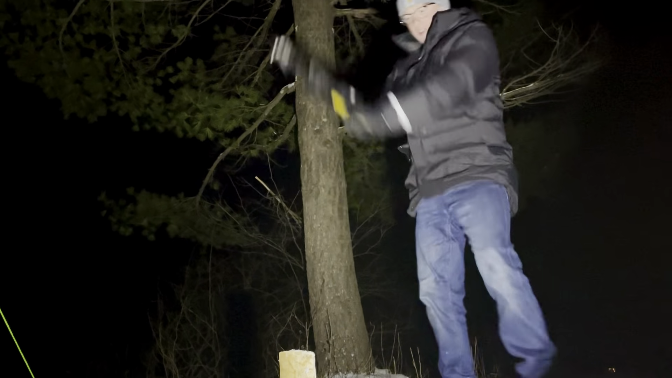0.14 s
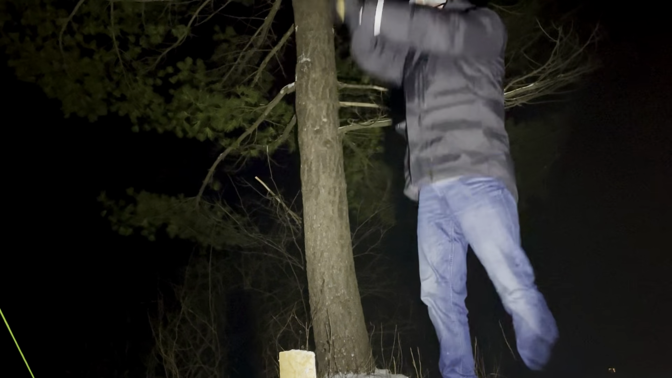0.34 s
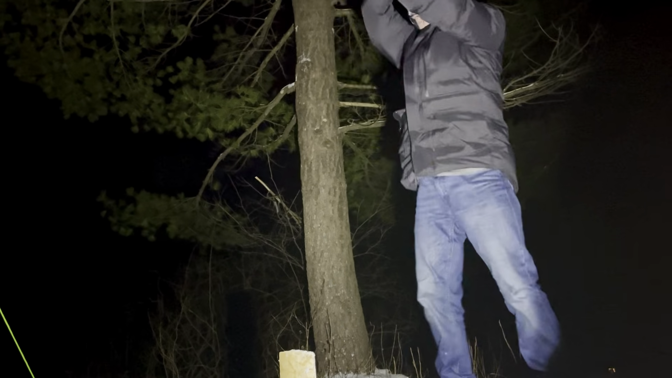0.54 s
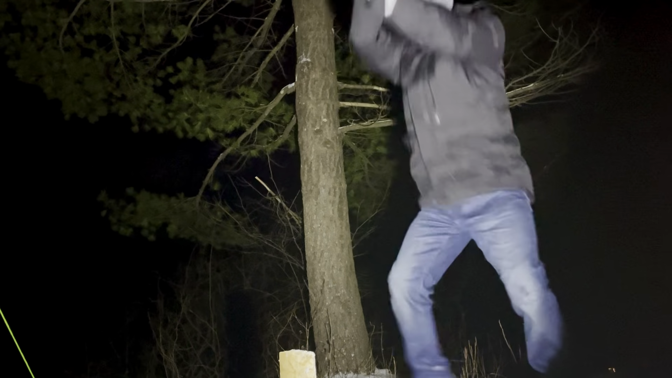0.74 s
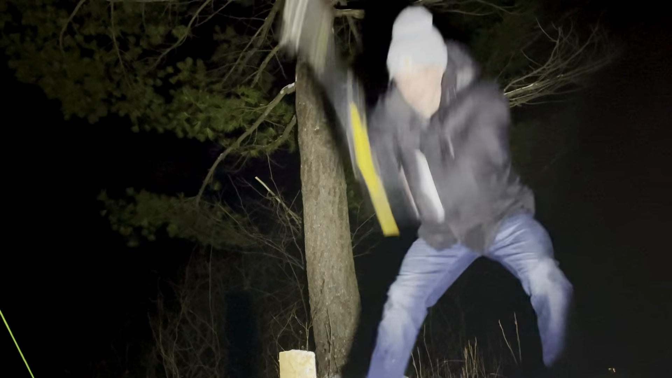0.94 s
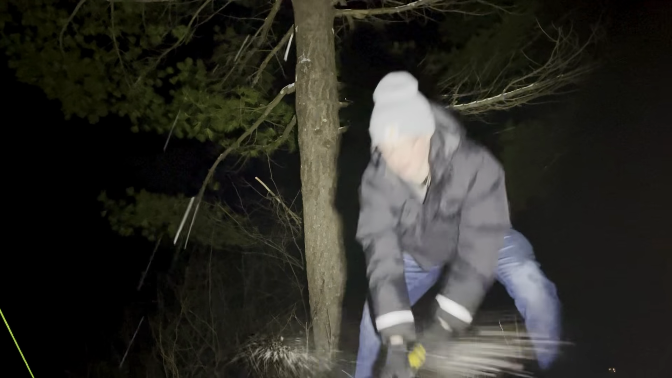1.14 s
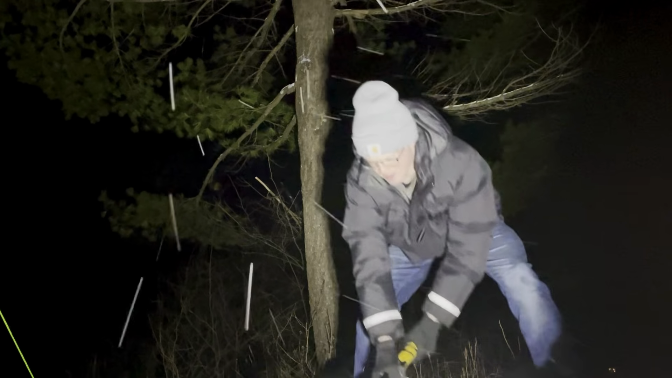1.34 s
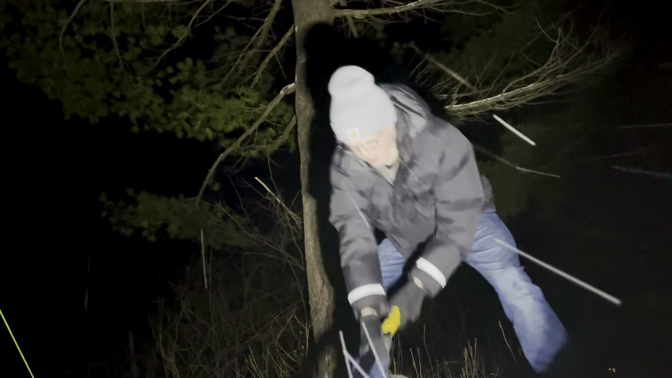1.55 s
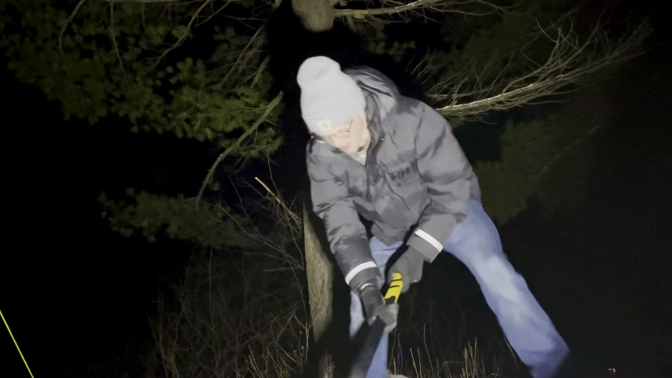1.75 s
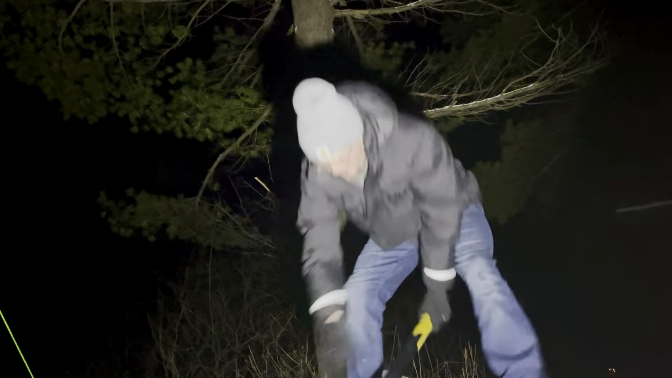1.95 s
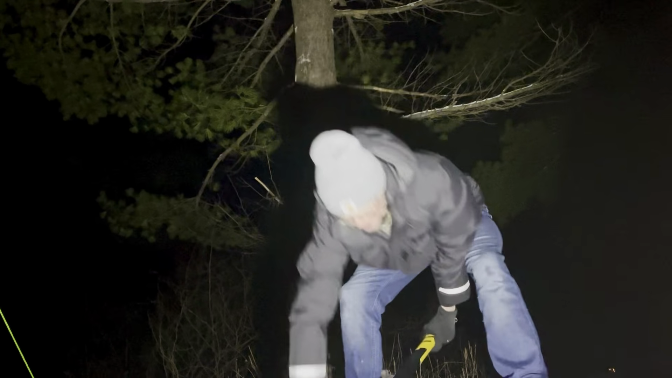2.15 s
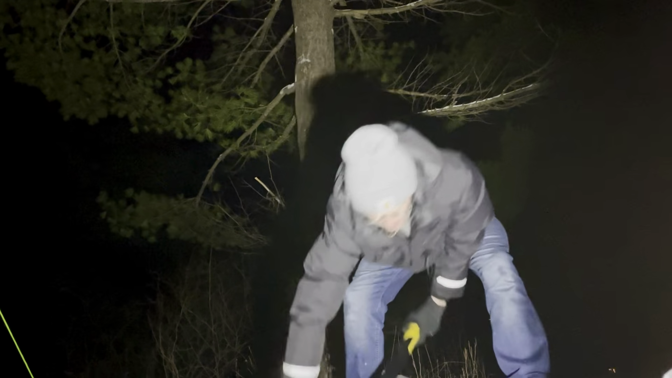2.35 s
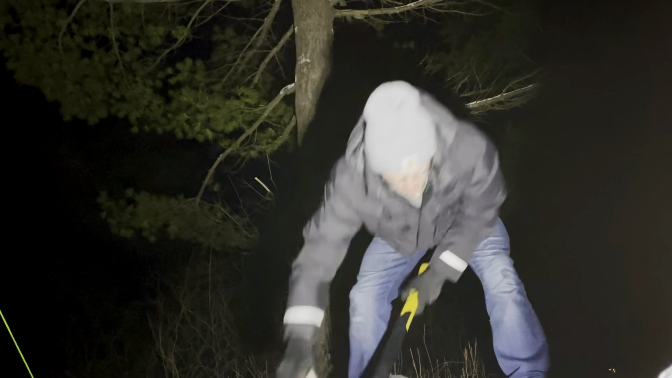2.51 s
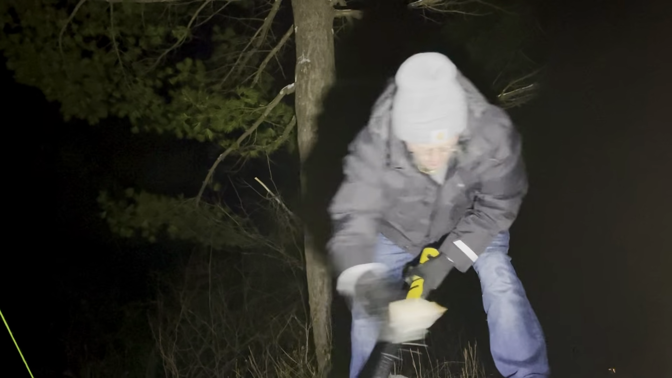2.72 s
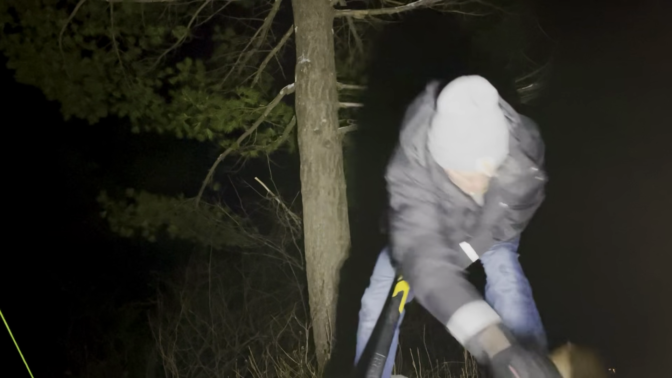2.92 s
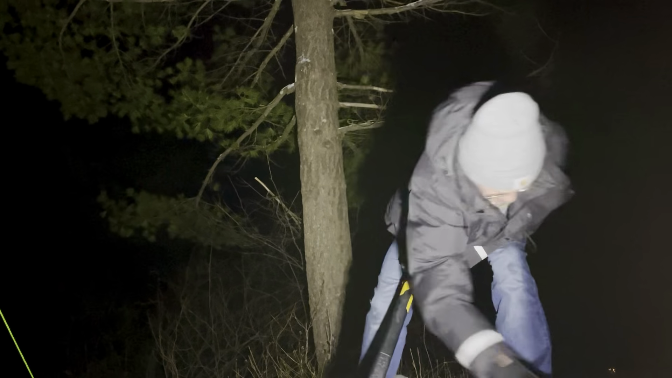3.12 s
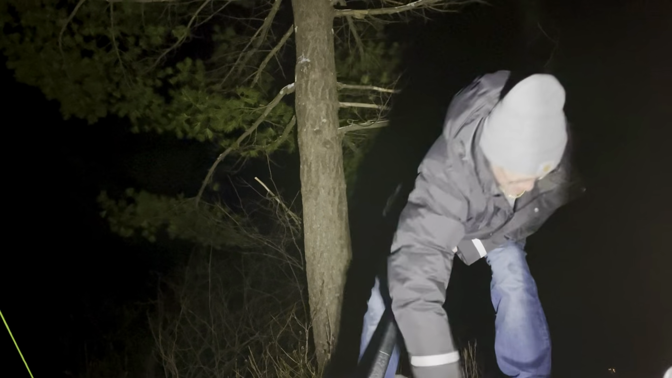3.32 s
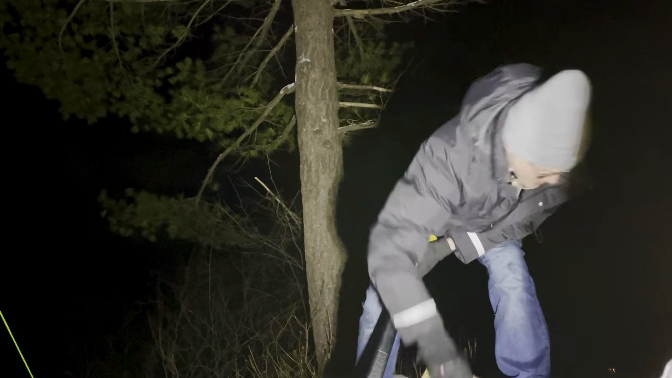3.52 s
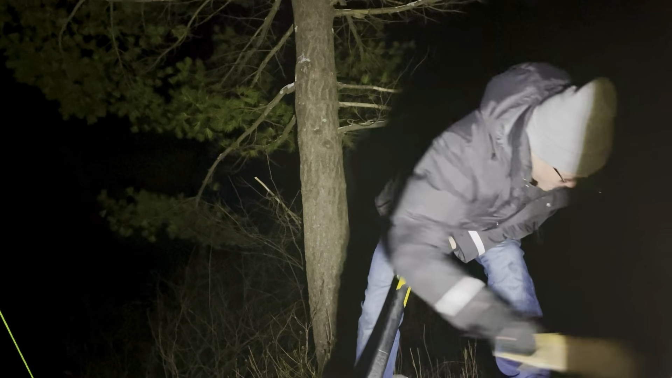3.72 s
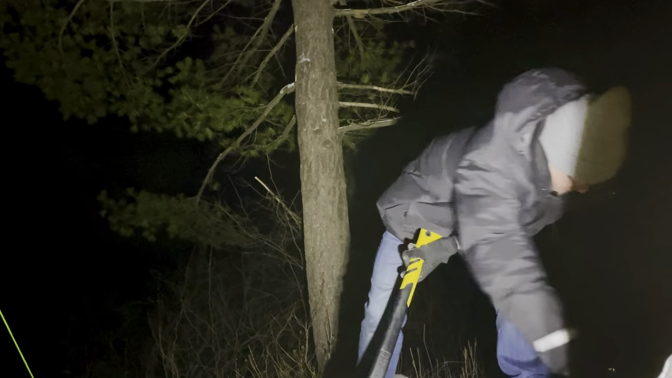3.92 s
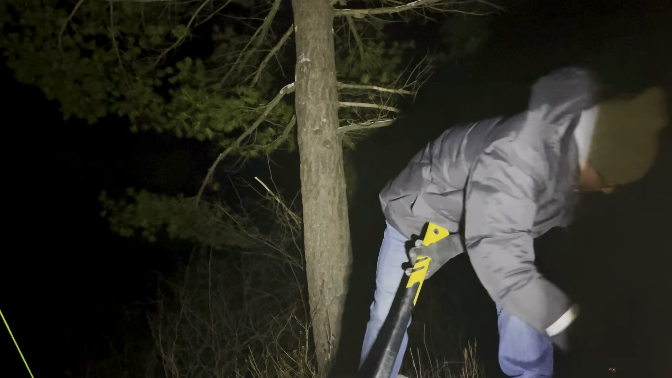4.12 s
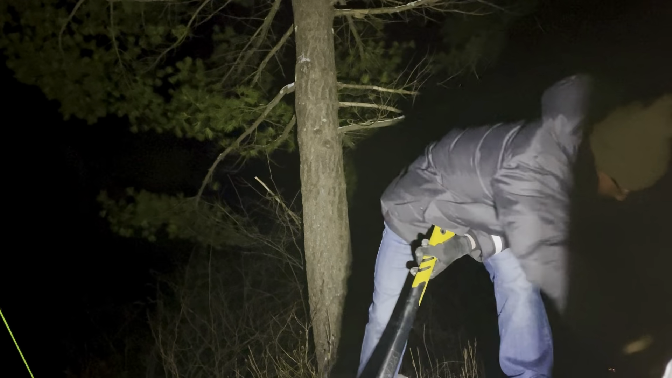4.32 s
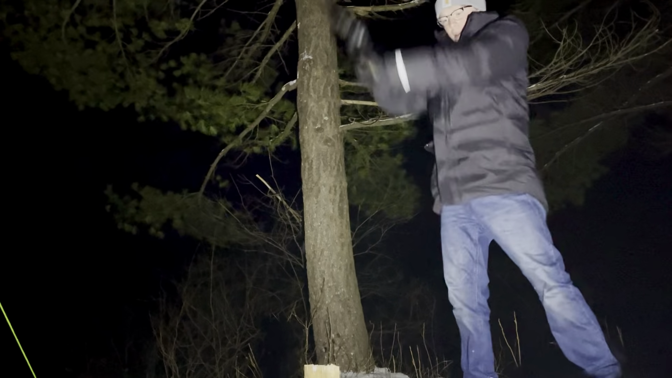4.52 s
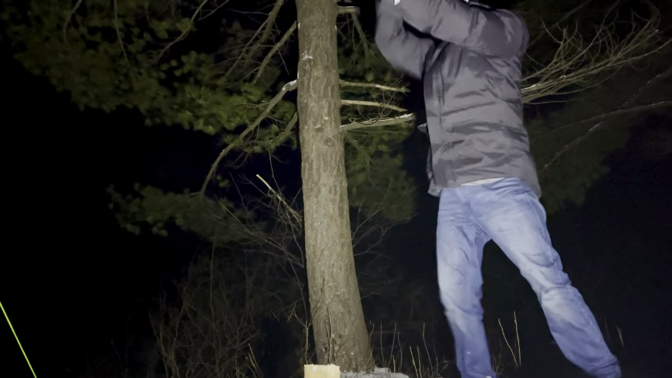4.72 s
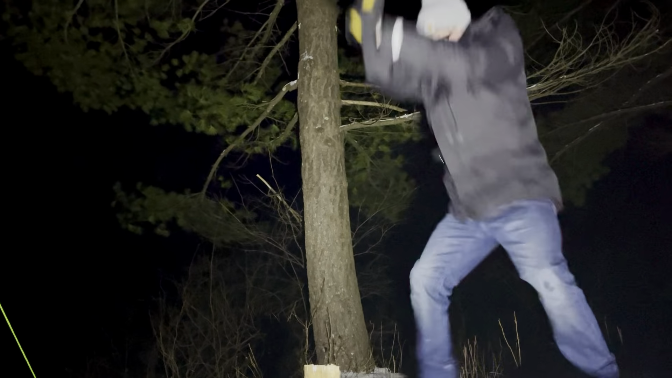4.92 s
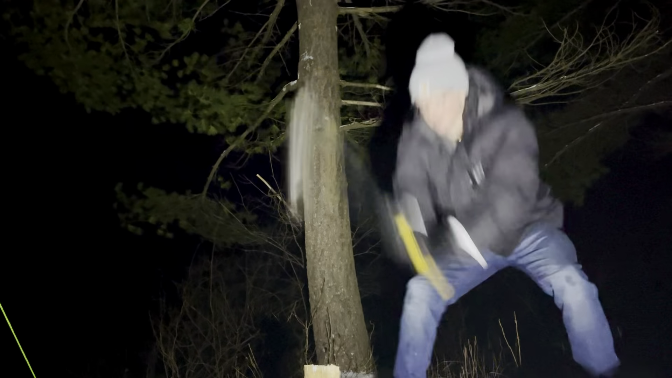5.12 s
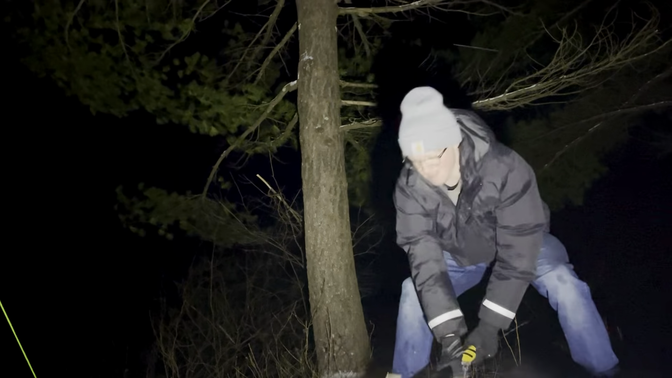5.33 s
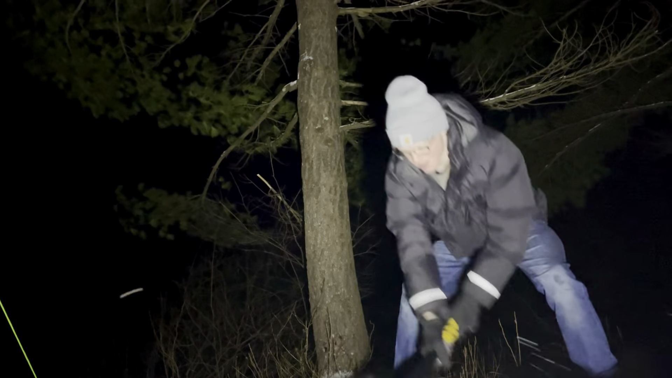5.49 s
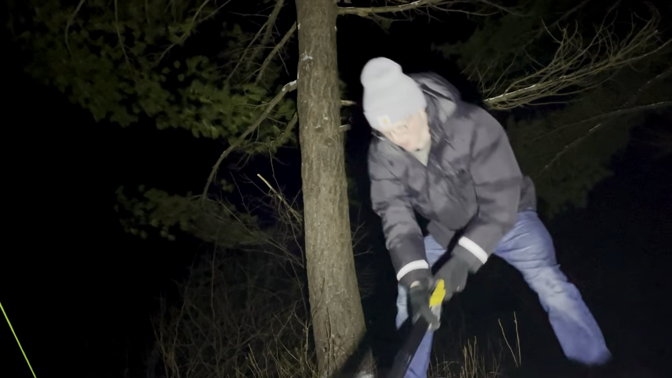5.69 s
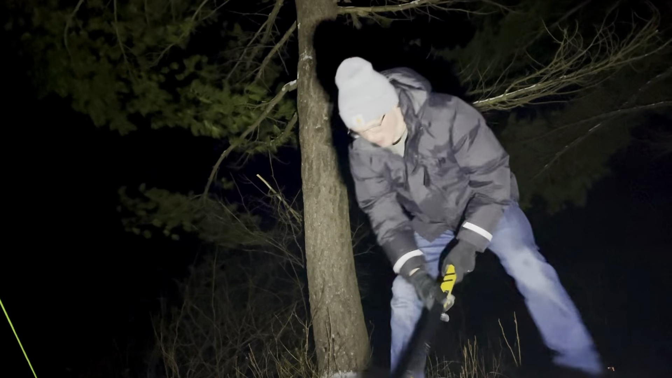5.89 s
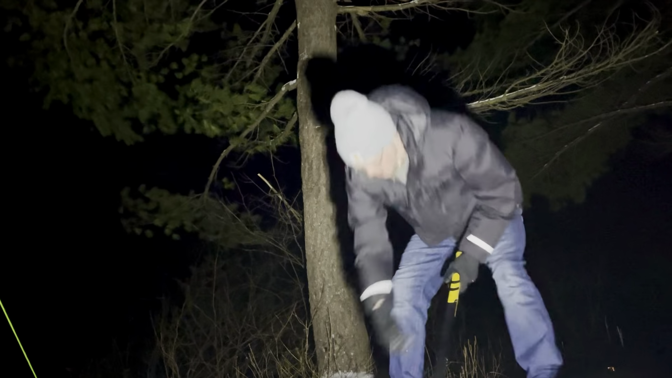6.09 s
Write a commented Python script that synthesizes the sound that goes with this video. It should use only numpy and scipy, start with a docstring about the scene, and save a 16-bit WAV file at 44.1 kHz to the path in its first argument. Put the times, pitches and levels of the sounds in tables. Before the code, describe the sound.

An axe cracks a log apart on a stump outdoors, splinters patter, billets knock, then a second split lands amid much stronger rumbling wind.

```python
"""A light wind rumbles and rushes among trees, boots shift, then an axe splits a log on a stump.
The blow is a low thud, ringing wood and a noisy tear; splinters and crumbs patter down as tiny ticks.
Loose billets knock together as short ringing modes, and a jacket swishes as crinkling noise.
After a cut, the second log is split in a much stronger wind, also made of coloured noise.
All the wood sounds feed a short, thin echo from the trees."""
import sys
import numpy as np
from scipy import signal
from scipy.fft import rfft, irfft, next_fast_len
from scipy.io import wavfile

SR = 44100
rng = np.random.default_rng(int(sys.argv[2]) if len(sys.argv) > 2 else 0)


def output_pcm(signal):
    """Save a mono or channel-first signal as 16-bit PCM at the path in sys.argv[1].

    Samples are clipped to [-1, 1] before scaling.
    """
    pcm = np.clip(np.atleast_2d(signal).T, -1, 1) * 32767
    wavfile.write(sys.argv[1], SR, np.round(pcm).astype(np.int16))


N = 275736
TIME = np.arange(N) / SR
BRIEF = TIME[:8192]  # time axis of a single short event

# Colour of the light wind: (frequency [Hz], relative level [dB])
CALM_COLOUR = [(20, -48), (35, -4), (60, 0.5), (120, -1), (350, -5.5), (600, -14.5), (1000, -13),
               (2000, -23.5), (3500, -30.5), (7000, -34.5), (9500, -40.5), (12500, -36), (14500, -56),
               (16000, -71)]
# Colour of the strong wind: (frequency [Hz], relative level [dB])
GUSTY_COLOUR = [(20, -31), (35, -13), (60, -2.5), (120, -4.5), (350, -14), (600, -16), (1000, -15.5),
                (2000, -23.5), (3500, -31.5), (7000, -39.5), (9500, -40), (12500, -41), (14500, -54),
                (16000, -72)]
# Course of the light wind: (time [s], relative rumble level [dB], relative rush level [dB])
BREEZE_COURSE = [(0.0, -47.5, -54.5), (0.41, -49, -56), (1.82, -41, -57), (1.98, -47.5, -55.5),
                 (2.73, -46, -57), (2.94, -45, -56), (4.36, -45.5, -58)]
# Course of the strong wind: (time [s], relative rumble level [dB], relative rush level [dB])
GUST_COURSE = [(4.62, -37.5, -46.5), (4.978, -34, -46), (5.95, -36, -45), (6.25, -34.5, -43.5)]
# Likeness of the two ears in the wind: (frequency [Hz], correlation [-1 to 1])
WIND_LIKENESS = [(30, 1), (150, 0.88), (350, 0.54), (600, 0.11), (1100, -0.4), (2000, 0.15), (3200, 0.17),
                 (4500, 0.32), (7000, 0.19)]
# Strongest puffs of wind on the microphone: (middle [s], peak level [dB], pitch [Hz])
WIND_BUFFETS = [(.07, -37, 63.3), (5.041, -26.5, 97.8), (5.522, -23.5, 78), (5.81, -27.5, 61.5),
                (6.048, -19, 63.8)]
# How long the echo from the trees lasts: (frequency [Hz], time to fall 60 dB [s])
ECHO_LENGTH = [(100, 0.36), (500, 0.17), (2000, 0.066), (6000, 0.14), (12000, 0.14)]
# Colour of that echo: (frequency [Hz], relative level [dB])
ECHO_COLOUR = [(100, -1), (400, -5), (1000, 1), (3000, 12), (6000, 8.5), (9000, 1), (16000, -1)]

# Broad arm movements: (middle [s], half length [s], level [dB], share of dull rubbing [0-1])
ARM_SWISHES = [(1.004, 0.081, -52, 0.8), (1.215, .04, -49, 0.43), (1.632, 0.1, -52.5, .53),
               (1.846, 0.061, -54, 0.5), (2.015, 0.033, -56, 1), (2.473, 0.071, -54, .46),
               (3.915, 0.11, -53.5, 1), (5.12, 0.097, -51.5, 0.54), (5.385, 0.011, -46, 1),
               (5.753, 0.097, -52, 1)]
# Colour of the thin cloth hiss: (frequency [Hz], relative level [dB])
CLOTH_HISS_COLOUR = [(300, -30), (3000, -4), (7000, -31), (9500, 2.5), (12000, 0), (14500, -5), (16000, -3)]
# Colour of dull rubbing and scraping: (frequency [Hz], relative level [dB])
RUB_COLOUR = [(200, -12), (1000, -18), (2500, 3.5), (3400, -2.5), (5000, -2), (6300, -1), (7600, -0.5),
              (12000, -2.5), (16000, -15.5)]

# Largest splinters landing in dry grass: (time [s], level [dB])
SPLINTER_LANDINGS = [(1.2888, -33), (1.3222, -34), (1.3306, -41), (1.365, -33), (1.429, -36),
                     (1.4877, -35.5), (1.512, -41), (1.546, -32), (1.5545, -33), (1.580, -30.5),
                     (1.605, -33.5), (5.7967, -26.5)]
# Colour of a splinter's tick: (frequency [Hz], relative level [dB])
TICK_COLOUR = [(200, -15), (1500, 0), (3000, -4), (6000, -6), (10000, 3.5), (13000, -7), (16000, -5)]

# Boots shifting on the soil: (time [s], level [dB], settled pitch [Hz])
BOOT_STEPS = [(0.488, -27.5, 387), (0.577, -29, 352), (.850, -25.5, 360), (1.798, -20.5, 215),
              (2.605, -27.5, 320)]
# Wood struck by the axe, by other wood or by the ground: (time [s], piece, ring level [dB],
# pitch that the contact favours [Hz], thud level [dB], settled thud pitch [Hz])
WOOD_IMPACTS = [(1.0304, "log", -6.5, 1120, -3, 165.3), (1.0625, "chip", -18, 1800, -24, 190),
                (1.171, "log", -45, 2500, -22.5, 153), (1.197, "log", -30.5, 740, -18.5, 193),
                (2.9313, "long billet", -10, 820, -6.5, 255), (2.9438, "long billet", -24, 654, -36, 300),
                (2.9555, "long billet", -27, 5200, -44, 300),
                (2.9633, "long billet", -22.5, 1380, -23, 400),
                (3.8641, "short billet", -21.5, 3700, -43, 300),
                (3.8686, "short billet", -18, 620, -14.5, 276),
                (3.8883, "short billet", -21.5, 2950, -16, 164), (5.1641, "log", -8, 1190, -4, 148),
                (5.1801, "log", -18, 1300, -11.5, 240), (5.202, "log", -20, 650, -12, 454),
                (5.2096, "log", -15.5, 650, -12, 195)]
# Ringing modes of each piece of wood, by name:
# (frequency [Hz], relative level [dB], time to fall 60 dB [s])
WOOD_MODES = { "log": [(561, 1, 0.019), (663, 2, 0.01), (826, -1.5, 0.016), (1056, -4.5, 0.015),
              (1262, -3, 0.012), (1696, -5.5, 0.018), (2550, -36, 0.014), (3220, -19, 0.022),
              (6200, -23, .035)], "chip": [(1890, 5.5, 0.016), (2202, -10.5, .022), (4800, -19, 0.035),
              (6040, -24, .04)], "long billet": [(527, -2, 0.03), (780, -15, 0.019), (890, -6.5, 0.027),
              (1200, -2, 0.015), (1570, -11, 0.034), (3515, -11, 0.047), (5780, -21, 0.041),
              (7600, -6, 0.021)], "short billet": [(640, 0, 0.0087), (977, -4.5, 0.066), (1260, -13, .025),
              (3020, -19, 0.03), (3610, -11.5, 0.026), (5640, -24, .025), (6270, -19, 0.033)]}

# The axe going through a log: (time [s], mid-range crack level [dB], treble fizz level [dB],
# tearing relative to the bite [dB], time until the halves part [s])
LOG_SPLITS = [(1.0293, -11.5, -12, -15, 0.0066), (5.161, -5, -8.5, -12.5, 0.049)]
# Thick strands in the log, and dry stalks under the falling halves, snapping:
# (time [s], mid-range crack level [dB], treble fizz level [dB])
STRAND_SNAPS = [(1.039, -28, -8), (1.0422, -33, -24), (1.0636, -27, -36), (1.172, -53, -33),
                (1.1993, -33, -31), (5.1795, -9, -15), (5.1886, -33, -8), (5.2124, -21, -8.5)]
# Colour of the mid-range crack of tearing wood: (frequency [Hz], relative level [dB])
CRACK_COLOUR = [(100, -58), (400, 0), (650, -6.5), (950, -1.5), (1500, -11.5), (2100, -18), (2750, -5),
                (3950, -16.5), (5300, -8), (7300, -26), (9000, -42.5), (16000, -59)]
# Colour of the treble fizz of tearing wood: (frequency [Hz], relative level [dB])
FIZZ_COLOUR = [(200, -20), (4000, -6.5), (7000, -4.5), (9000, 0), (10500, 1.5), (12500, -7.5), (14500, -6),
               (16000, -17.5)]


def amp(db):
    """Turns decibels into an amplitude factor."""
    return 10 ** (np.asarray(db) / 20)


def evened(x):
    """Scales a signal to unit effective level."""
    return x / np.sqrt(np.mean(x ** 2) + 1e-20)


def read(points, hz):
    """Reads a curve between its points, along a logarithmic frequency axis."""
    f, value = np.transpose(points)
    return np.interp(np.log(hz + 1), np.log(f + 1), value)


def add(mix, s, sound):
    """Mixes a sound in at a time in seconds."""
    part = mix[..., round(s * SR):][..., :sound.shape[-1]]
    part += sound[..., :part.shape[-1]]


def filtered(x, gain):
    """Applies a gain given as a function of frequency."""
    size = next_fast_len(N + SR // 2)
    hz = np.fft.rfftfreq(size, 1 / SR)
    return irfft(rfft(x, size) * gain(hz), size)[..., :N]


def coloured(x, points):
    """Causal filter of unit energy, so that attacks stay sharp."""
    hz = abs(np.fft.fftfreq(len(BRIEF), 1 / SR))
    log_gain = np.log(amp(read(points, hz)))
    spectrum = np.exp(np.conj(signal.hilbert(log_gain)))  # minimum phase
    taps = np.fft.ifft(spectrum).real[:len(BRIEF) // 2]
    return signal.fftconvolve(x, taps[None] / np.linalg.norm(taps), axes=1)[:, :N]


def wander(rate_hz):
    """Random drift of unit size, smoothed above the given rate."""
    return evened(filtered(rng.standard_normal(N), lambda hz: np.exp(-(hz / rate_hz) ** 2)))


def pair(likeness):
    """White noise for two ears, partly shared."""
    shared = np.clip(likeness, 0, 1)
    common = rng.standard_normal(N)
    own = rng.standard_normal((2, N))
    return np.sqrt(shared) * common + np.sqrt(1 - shared) * own


def from_right(x, lag_ms):
    """A sound from the right reaches the left ear later."""
    left = filtered(x[0], lambda hz: np.exp(-2j * np.pi * hz * lag_ms / 1000))
    return np.array([left, x[1]])


def wind(colour, course, rumble_db, rush_db, lumps_db, flutter_db):
    """A lumpy rumble near by under the smoother rush of far trees."""
    def likeness(hz):
        return np.clip(read(WIND_LIKENESS, hz), -1, 1)

    # the balance of mid and side noise sets how alike the ears are
    mid_noise, side_noise = rng.standard_normal((2, N))
    mid = filtered(mid_noise, lambda hz: amp(read(colour, hz)) * np.sqrt(1 + likeness(hz)))
    side = filtered(side_noise, lambda hz: amp(read(colour, hz)) * np.sqrt(1 - likeness(hz)))
    air = np.array([mid + side, mid - side])
    low = filtered(air, lambda hz: 1 / (1 + (hz / 380) ** 4))

    s, rumble, rush = np.transpose(course)
    near_level = amp(np.interp(TIME, s, rumble) + rumble_db)
    near = evened(low * amp(lumps_db * wander(rate_hz=18.0))) * near_level
    far_level = amp(np.interp(TIME, s, rush) + rush_db + flutter_db * wander(rate_hz=22))
    far = evened(air - low) * far_level
    return near + far


def buffets(half_s=0.021):
    """Single eddies shake the microphone for a few slow cycles."""
    out = np.zeros(N)
    for s, db, hz in WIND_BUFFETS:
        swell = amp(db) * np.exp(-((TIME - s) / half_s) ** 2)
        out += swell * np.sin(2 * np.pi * (hz * TIME + rng.random()))
    return out


def trees(x, wet_db=-17, build_s=0.0079):
    """Trunks and ground scatter a short, thin echo."""
    # one tap in ten reflects
    taps = rng.standard_normal((2, SR // 2)) * (rng.random((2, SR // 2)) < .1)
    hz, t, z = signal.stft(taps, SR, nperseg=256)
    fade = amp(-60 * t / read(ECHO_LENGTH, hz)[:, None]) * (1 - np.exp(-t / build_s))
    tail = signal.istft(z * fade, SR)[1]
    echo = signal.fftconvolve(x, tail / np.linalg.norm(tail[0]), axes=1)[:, :N]
    return amp(wet_db) * filtered(echo, lambda hz: amp(read(ECHO_COLOUR, hz)))


def jacket(crinkle_db=2.5, stir_db=-66, stir_uneven_db=3, stir_rate_hz=1.2):
    """Sleeves slide over the coat in a thin hiss and a duller rub, above a faint stirring of cloth."""
    # powers, so that overlapping movements add up
    thin = amp(stir_db + stir_uneven_db * wander(rate_hz=stir_rate_hz)) ** 2
    dull = np.zeros(N)
    for s, half, db, share in ARM_SWISHES:
        power = amp(db) ** 2 * np.exp(-((TIME - s) / half) ** 2)
        thin += power * (1 - np.clip(share, 0, 1))
        dull += power * np.clip(share, 0, 1)

    def weave():
        return evened(pair(likeness=0.21) * amp(crinkle_db * wander(rate_hz=210)))

    hiss = coloured(weave() * np.sqrt(thin), CLOTH_HISS_COLOUR)
    rub = coloured(weave() * np.sqrt(dull), RUB_COLOUR)
    return hiss + rub


def crumbs(middle_s=1.44, half_s=0.16, most_per_s=170, db=-49, uneven_db=0.5, tick_db=-3):
    """Bark crumbs and small splinters thrown up by the first blow patter down in a shower."""
    rate = most_per_s * np.exp(-((TIME - middle_s) / half_s) ** 2)
    strength = amp(db + uneven_db * np.clip(rng.standard_normal(N), -2, 2))
    landings = (rng.random(N) < rate / SR) * strength
    level = signal.lfilter([1], [1, -np.exp(-1 / (SR * .001))], landings)  # 1 ms decay
    rustle = coloured(level * pair(likeness=0.22), RUB_COLOUR)
    ticks = coloured(level * pair(likeness=0.22), TICK_COLOUR)
    return rustle + amp(tick_db) * ticks


def splinters(decay_s=0.0012, colour_db=4):
    """Light chips tick once as they land, each with a colour of its own."""
    out = np.zeros((2, N))
    hz, db = np.transpose(TICK_COLOUR)
    for s, level_db in SPLINTER_LANDINGS:
        tick = amp(level_db) * np.exp(-BRIEF / decay_s) * rng.standard_normal((2, len(BRIEF)))
        own_colour = np.column_stack([hz, db + colour_db * rng.standard_normal(len(hz))])
        add(out, s, coloured(tick, own_colour))
    return out


def thud(db, hz, rise_s=0.0013, settle_s=0.0014, stiffness=3.22, hardening=0.44, cycles=6.76):
    """A contact stiffer for harder blows starts high, then stump and soil swing slower for a few cycles."""
    stiff = stiffness * amp(db * hardening)  # relative rise in pitch at the start
    turns = np.cumsum(hz * (1 + stiff * np.exp(-BRIEF / settle_s))) / SR
    fade = amp(db - 60 * BRIEF * hz / cycles)  # falls 60 dB within this many cycles
    return fade * np.sin(2 * np.pi * turns) * (1 - np.exp(-BRIEF / rise_s))


def thuds(lag_s=0.0015):
    """Every impact and every step shakes the stump or the ground; impact thuds follow contact by a lag."""
    out = np.zeros(N)
    for s, _, _, _, db, hz in WOOD_IMPACTS:
        add(out, s + lag_s, thud(db, hz))
    for s, db, hz in BOOT_STEPS:
        add(out, s, thud(db, hz))
    return out * amp([[1.4], [-1.4]])  # left, right balance


def knocks(scrape_db=-15, scrape_s=0.002, uneven_db=1.5, focus=0.98):
    """Each contact wakes the modes near its own pitch; bark scrapes briefly as the pieces meet."""
    out = np.zeros((2, N))
    scrape = np.zeros(N)
    for s, piece, strength_db, contact_hz, _, _ in WOOD_IMPACTS:
        hz, db, t60 = np.transpose(WOOD_MODES[piece])
        modes = amp(-60 * BRIEF / t60[:, None]) * np.sin(2 * np.pi * hz[:, None] * BRIEF)
        woken = 1 / np.hypot(1, focus * (hz / contact_hz - contact_hz / hz))
        # each mode radiates unevenly towards the two ears; neighbouring modes start in opposite sense
        reach = amp(db + uneven_db * rng.standard_normal((2, len(hz))))
        reach = reach * (-1) ** np.arange(len(hz))
        add(out, s, amp(strength_db) * (reach * woken) @ modes)
        add(scrape, s, amp(strength_db + scrape_db) * np.exp(-BRIEF / scrape_s))
    bark = coloured(scrape * pair(likeness=0.5), RUB_COLOUR)
    return out * amp([[-1], [1]]) + bark


def tears(grain_db=1.5, rise_s=0.00033, bite_s=0.0052, snap_s=0.0019, release_s=0.0082,
          crack_sag_db_per_s=260, fizz_sag_db_per_s=110):
    """The edge bites, fibres tear ever more weakly until the halves part, and strands snap: uneven noise."""
    def burst(decay_s):
        return np.exp(-2 * BRIEF / decay_s) * (1 - np.exp(-BRIEF / rise_s))

    # powers, so that overlapping breaks add up
    crack, fizz = np.zeros((2, N))
    for s, crack_db, fizz_db, tearing_db, part_s in LOG_SPLITS:
        release = np.exp(-2 * np.maximum(BRIEF - part_s, 0) / release_s)
        tearing = amp(tearing_db) ** 2 * (1 - np.exp(-BRIEF / bite_s)) * release
        power = burst(bite_s) + tearing
        add(crack, s, power * amp(crack_db - crack_sag_db_per_s * BRIEF) ** 2)
        add(fizz, s, power * amp(fizz_db - fizz_sag_db_per_s * BRIEF) ** 2)
    for s, crack_db, fizz_db in STRAND_SNAPS:
        add(crack, s, amp(crack_db) ** 2 * burst(snap_s))
        add(fizz, s, amp(fizz_db) ** 2 * burst(snap_s))

    fibres = evened(pair(likeness=0.53) * amp(grain_db * wander(rate_hz=8500)))
    mid_range = coloured(fibres * np.sqrt(crack), CRACK_COLOUR) * amp([[-1.2], [1.2]])
    treble = coloured(fibres * np.sqrt(fizz), FIZZ_COLOUR)
    return mid_range + treble


def scene():
    """Layers wind, cloth, wood and the echo of the wood."""
    breeze = wind(CALM_COLOUR, BREEZE_COURSE, rumble_db=2, rush_db=4, lumps_db=2.5, flutter_db=1.5)
    gust = wind(GUSTY_COLOUR, GUST_COURSE, rumble_db=1.5, rush_db=3.5, lumps_db=1.5, flutter_db=0.56)
    # a cut: the light wind breaks off, and after a brief dip the strong wind begins
    light = np.interp(TIME, [4.375, 4.395], [1, 0])
    strong = np.interp(TIME, [4.41, 4.44], [0, 1])
    air = breeze * np.maximum(light, 0.15 * (1 - strong)) + gust * strong
    air = air * amp([[.4], [-.4]])

    wood = splinters() + crumbs()
    wood += from_right(thuds(), lag_ms=0.11)
    wood += from_right(knocks(), lag_ms=0.2)
    wood += from_right(tears(), lag_ms=0.15)
    return air + buffets() + jacket() + trees(wood) + wood


def record(dry, low_cut_hz=36, treble_hz=7300, treble_lag=8, ceiling=.85, edge_hz=15900):
    """Low cut, one shared treble a few samples later on the right, overload and the upper band limit."""
    dry = signal.sosfilt(signal.butter(2, low_cut_hz, "high", fs=SR, output="sos"), dry)

    def top(hz):
        return np.clip((hz - treble_hz) / 500, 0, 1)

    def late(hz):
        return np.exp(-2j * np.pi * hz * treble_lag / SR)

    # both sides take their treble from the right channel
    treble_left = filtered(dry[1], top)
    treble_right = filtered(dry[1], lambda hz: top(hz) * late(hz))
    body = filtered(dry, lambda hz: 1 - top(hz))
    both = np.clip(body + np.array([treble_left, treble_right]), -ceiling, ceiling)
    return filtered(both, lambda hz: np.clip((edge_hz - hz) / 700 + .5, 0, 1))


dry = scene()
out = record(dry)
output_pcm(out)
```